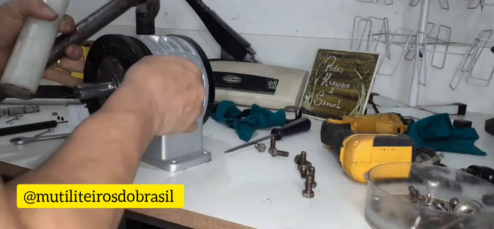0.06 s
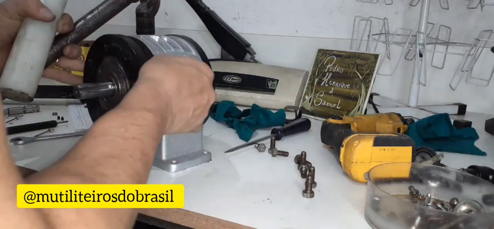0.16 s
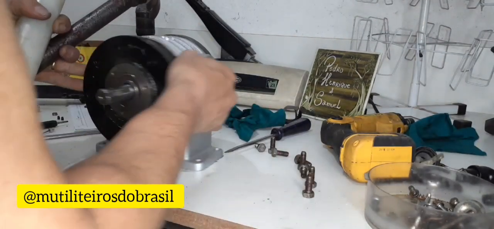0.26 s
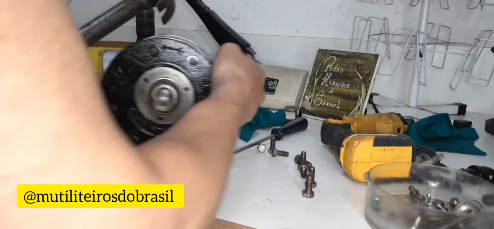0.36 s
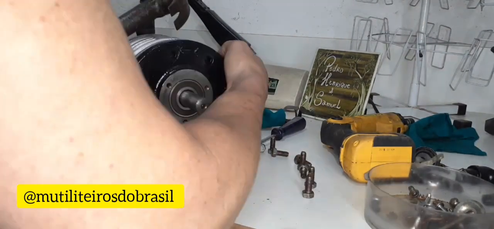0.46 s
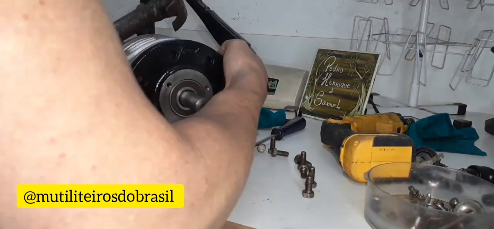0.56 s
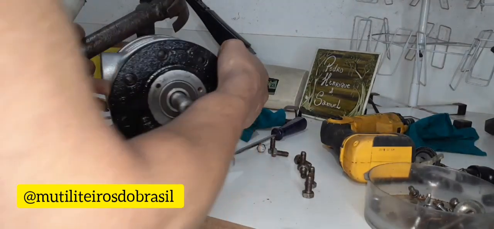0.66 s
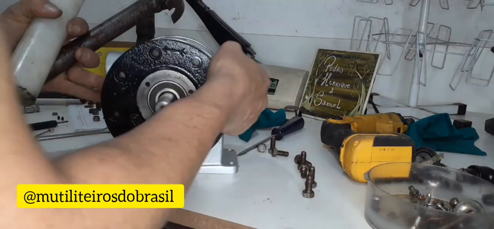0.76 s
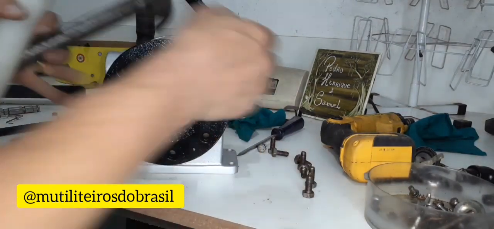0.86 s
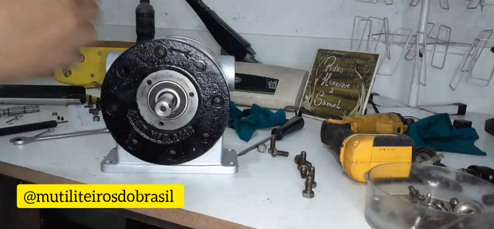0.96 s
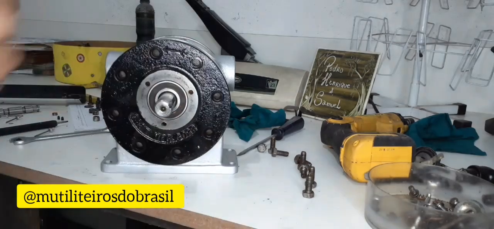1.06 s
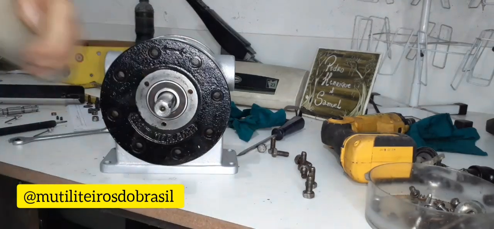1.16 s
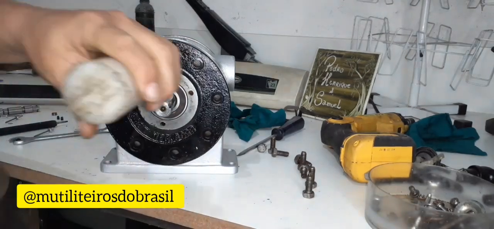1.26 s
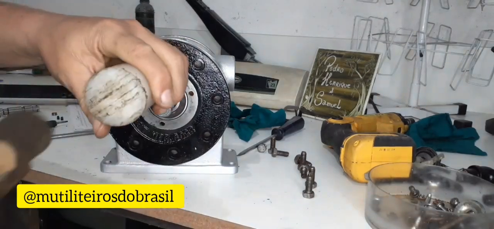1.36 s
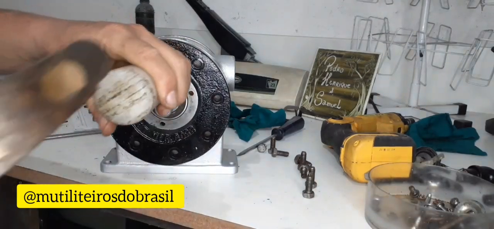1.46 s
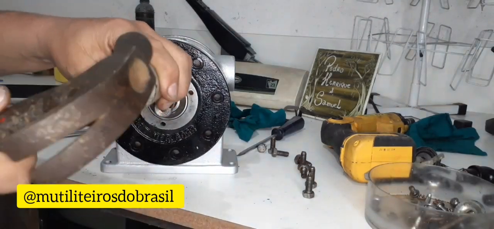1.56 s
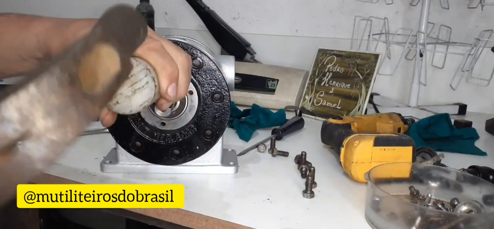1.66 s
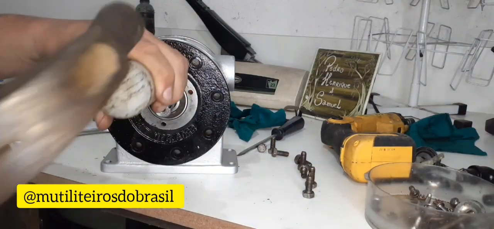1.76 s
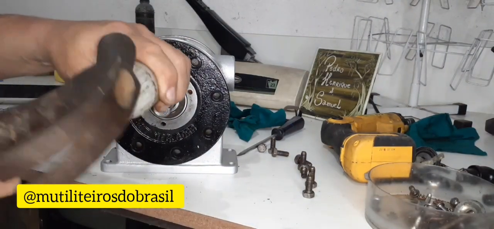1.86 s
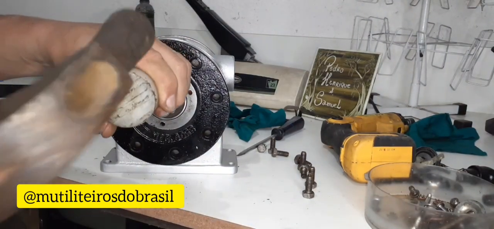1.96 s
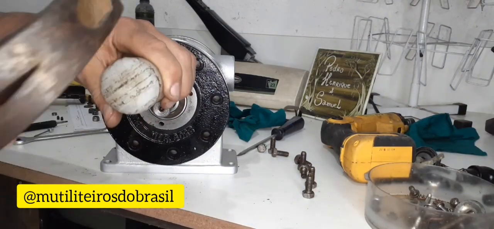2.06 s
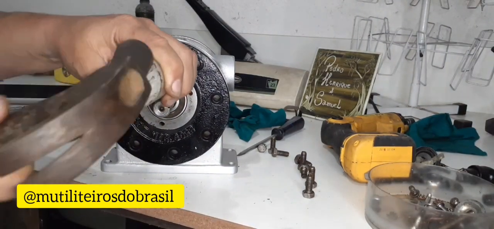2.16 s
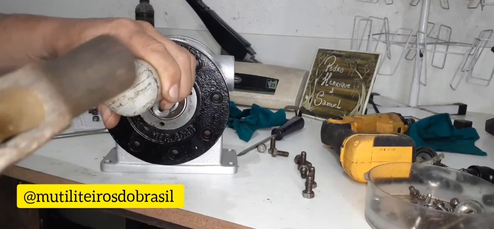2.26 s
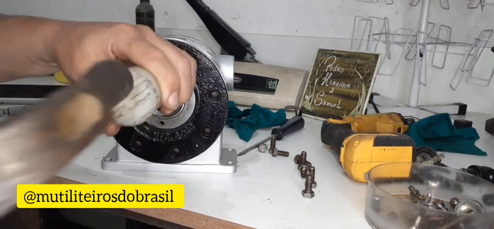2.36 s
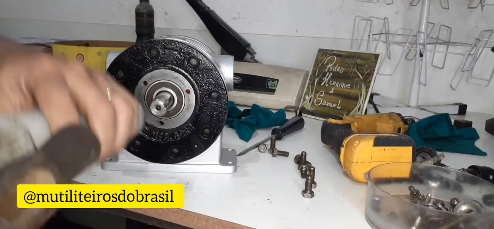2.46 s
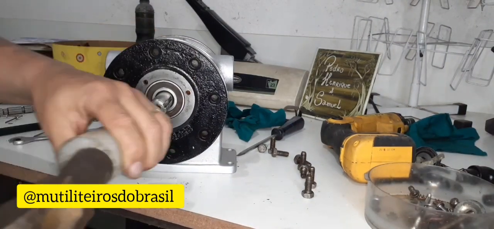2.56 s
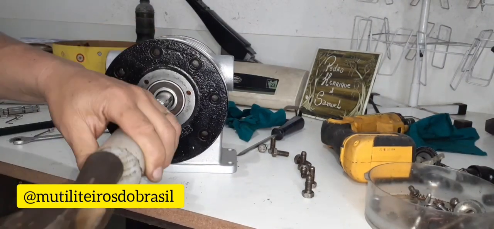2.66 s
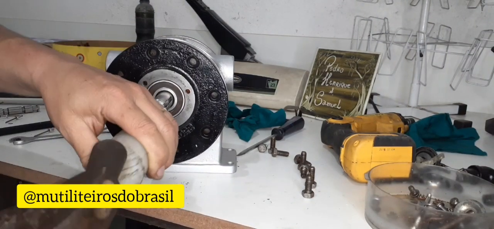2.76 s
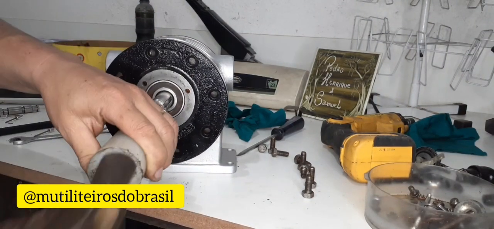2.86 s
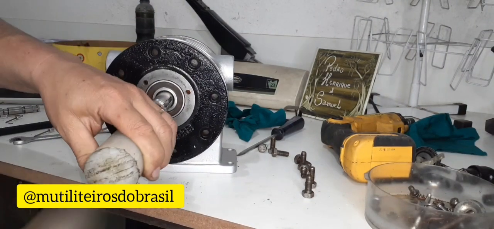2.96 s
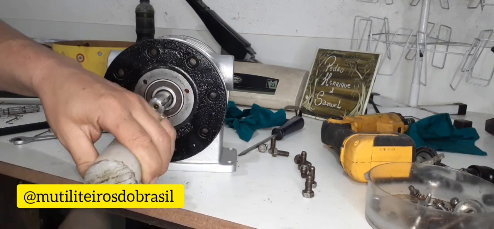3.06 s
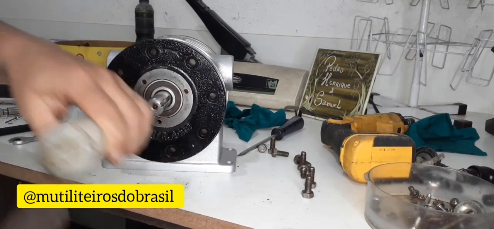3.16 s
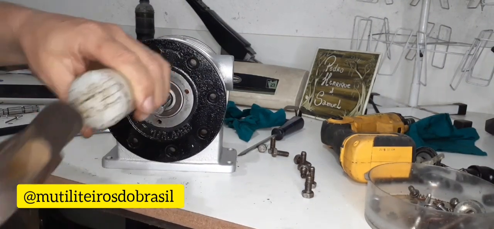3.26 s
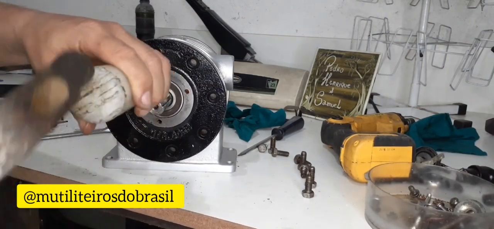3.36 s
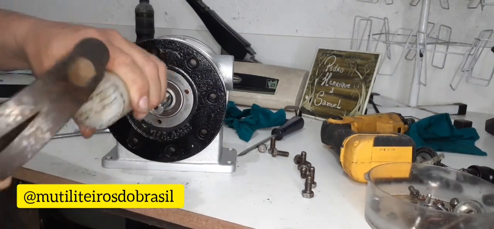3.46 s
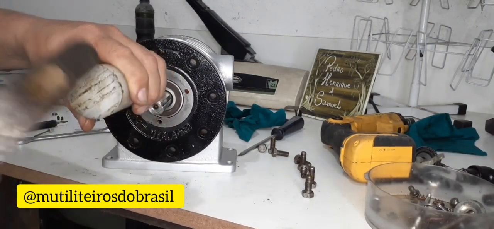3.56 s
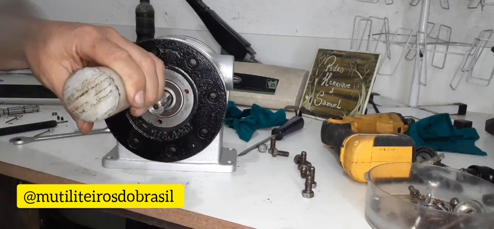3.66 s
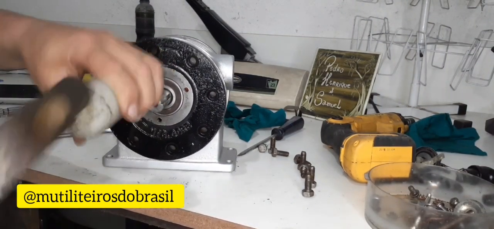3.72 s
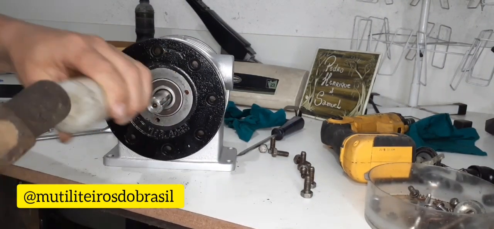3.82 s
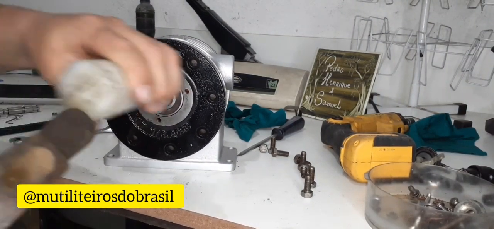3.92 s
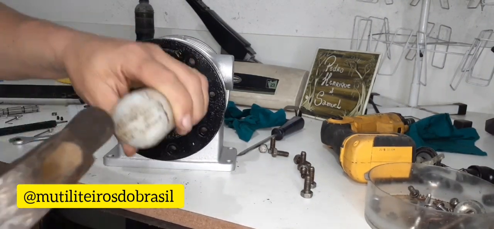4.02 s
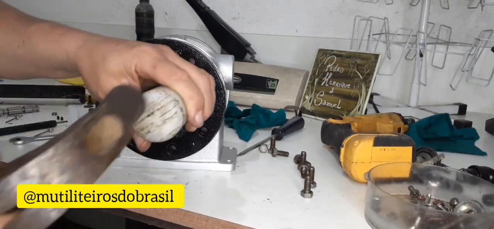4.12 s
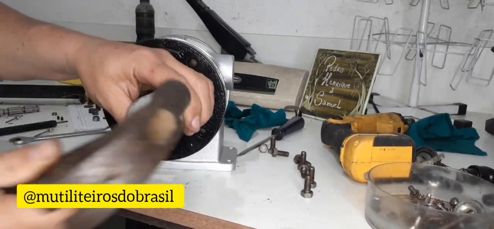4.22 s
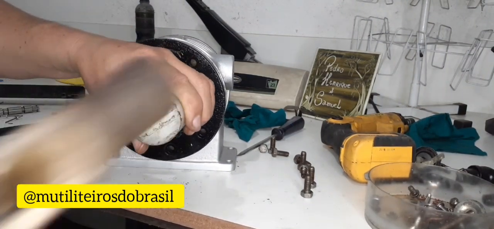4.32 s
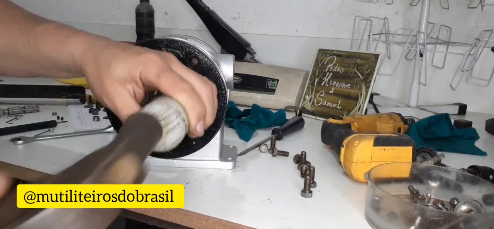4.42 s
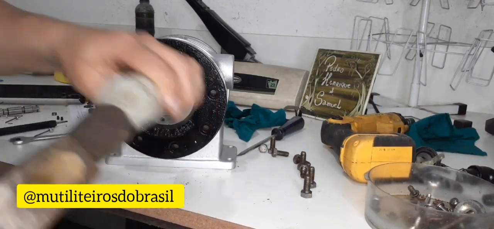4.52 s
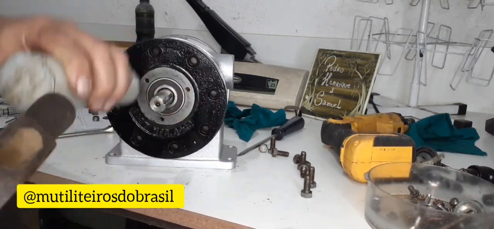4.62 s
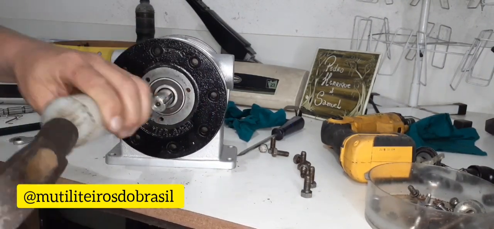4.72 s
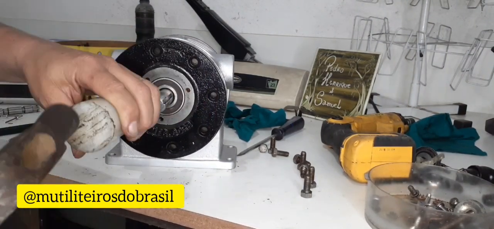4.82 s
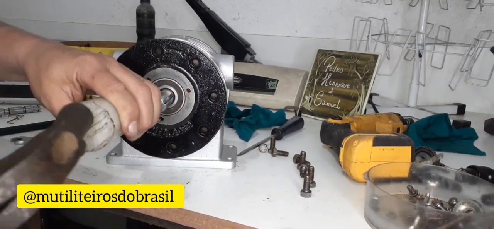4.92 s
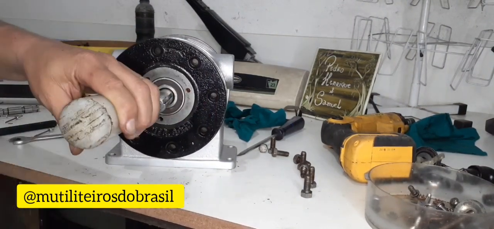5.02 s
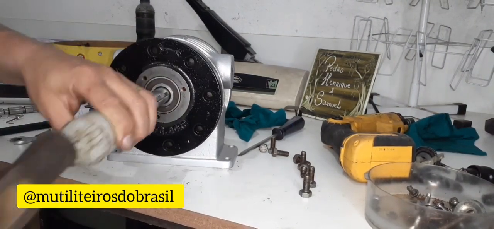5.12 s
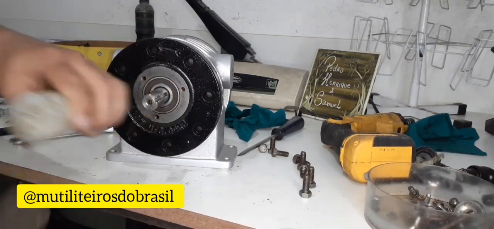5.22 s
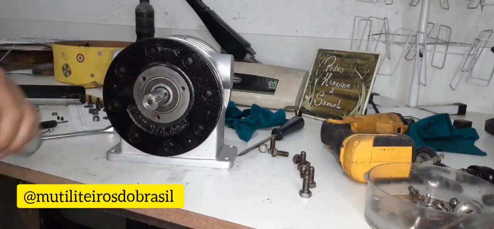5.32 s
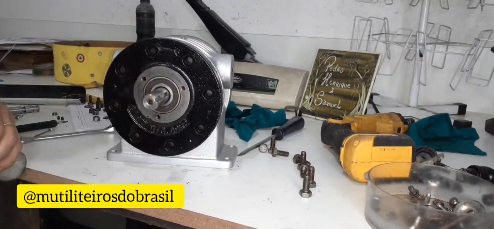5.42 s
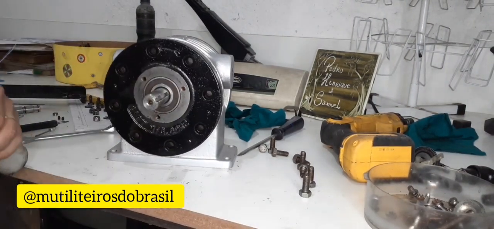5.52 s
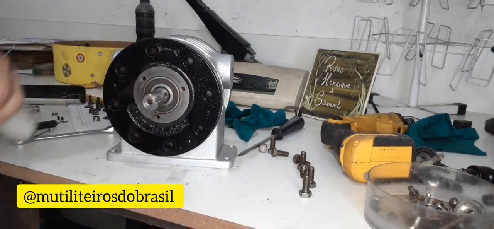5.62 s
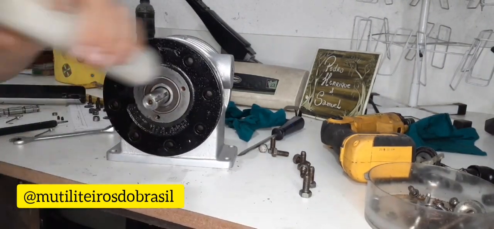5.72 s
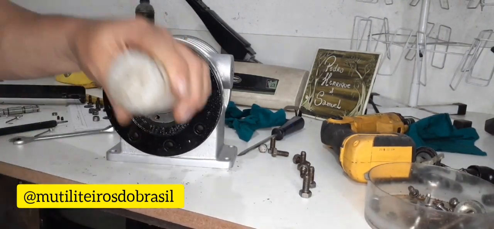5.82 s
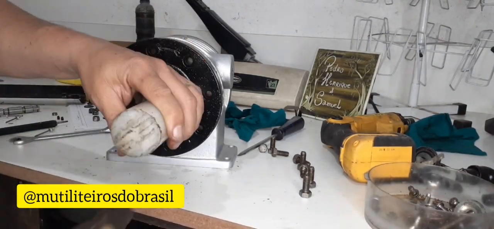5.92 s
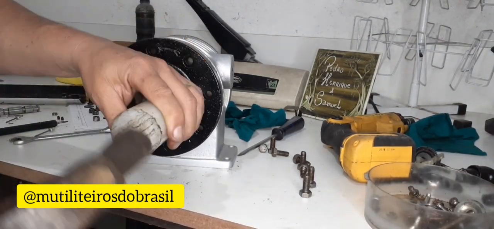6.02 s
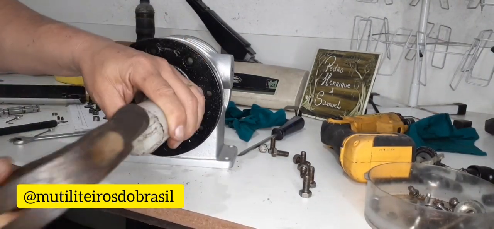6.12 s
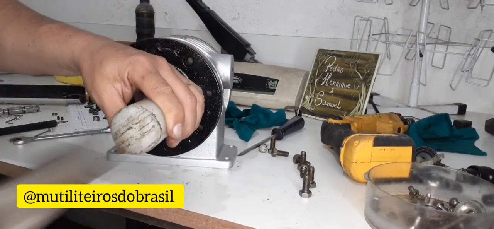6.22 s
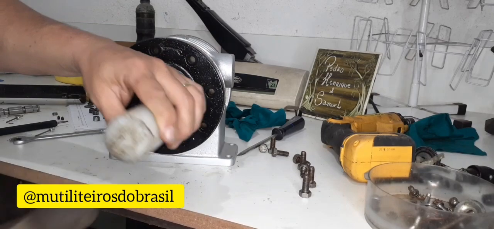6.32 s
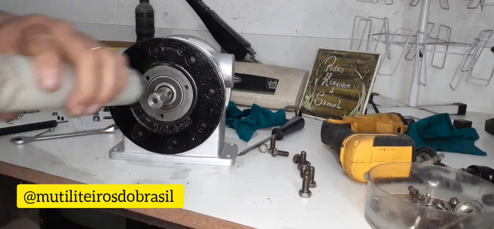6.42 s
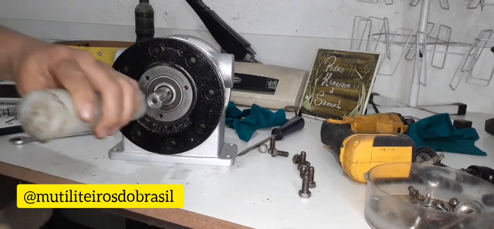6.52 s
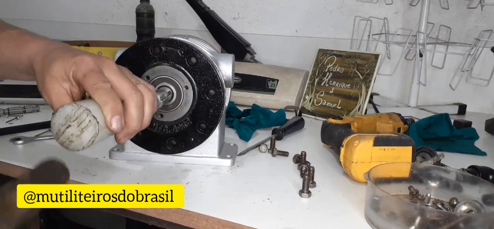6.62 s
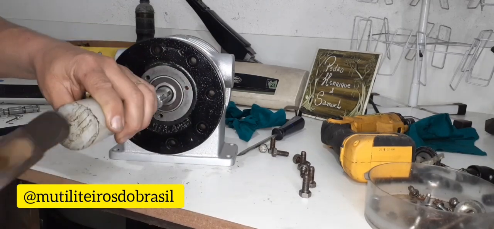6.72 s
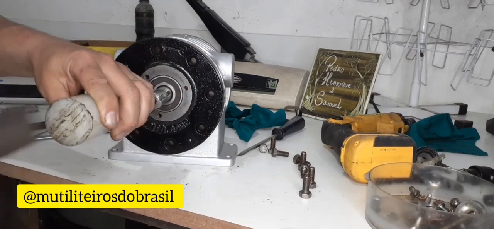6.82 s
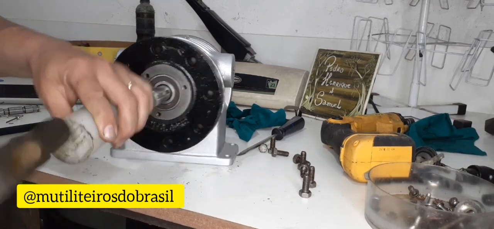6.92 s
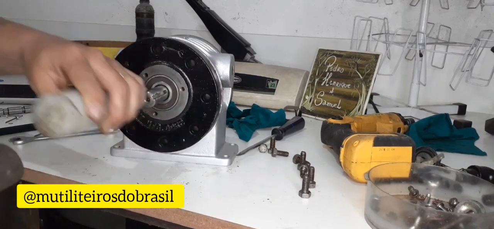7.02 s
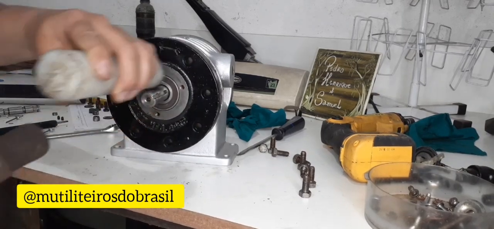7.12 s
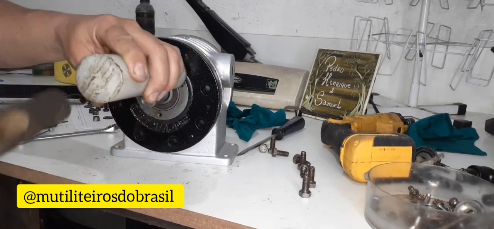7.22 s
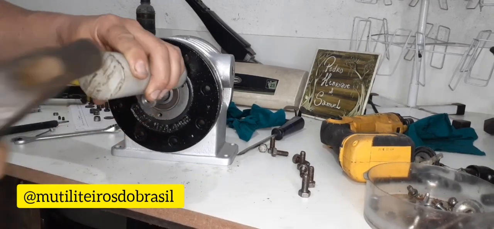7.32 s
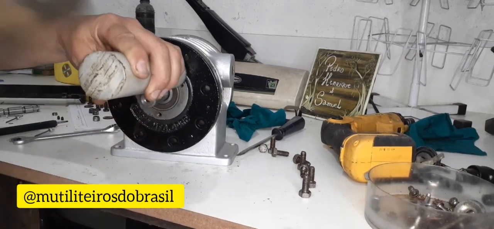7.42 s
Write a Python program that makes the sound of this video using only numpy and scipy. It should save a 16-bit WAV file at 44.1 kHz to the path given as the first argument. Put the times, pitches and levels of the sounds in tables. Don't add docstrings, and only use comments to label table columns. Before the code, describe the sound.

Close workshop hammering: brief metal-foot scrapes, small handling rustles, then irregular hard knocks with short metallic ring, gritty skids and bench thuds.

```python
import sys
import numpy as np
from scipy import signal
from scipy.fft import rfft, irfft
from scipy.io import wavfile
from scipy.ndimage import uniform_filter1d

SR = 44100
rng = np.random.default_rng(int(sys.argv[2]) if len(sys.argv) > 2 else 0)


def voltage_ratio(decibels):
    exponent = np.asarray(decibels, float) / 20
    return 10 ** exponent


def generate_wav(sig):
    pcm = np.round(np.clip(np.atleast_2d(sig).T, -1, 1) * 32767).astype(np.int16)
    wavfile.write(sys.argv[1], SR, pcm)


N = 329868
LEAD_S = 0.00015

# pitch in Hz, level in dB, t60 in s.
BENCH_MODES = [(76, -21, 0.27), (113.6, -4, 0.14), (139.5, -6, 0.06), (186.9, -2.5, 0.14),
               (191.6, -27, 0.86), (235, 5, 0.077), (287, -4.5, 0.03), (318, 1, 0.083), (445, -5.5, 0.15)]
# frequency in Hz, level in dB per Hz.
FOOT_GRIT = [(35, -39), (60, -14), (287, -4.5), (448, -11), (822, -7.5), (1200, -3.5), (2190, -4),
             (4120, -16), (5720, -19.5), (7230, -30.5), (9790, -22), (11300, -34.5), (16000, -41)]
# frequency in Hz, level in dB per Hz.
HISS_COLOUR = [(1000, -8.5), (3000, -3), (7000, -11), (8500, -4), (10000, -4.5), (15000, -12)]


def evened(x):
    return x / np.sqrt(np.mean(x ** 2) + 1e-30)


def read(points, hz):
    f, value = np.transpose(points)
    return np.interp(np.log(hz + 1), np.log(f + 1), value)


def slope(hz, corner_hz):
    return -10 * np.log10(1 + (hz / corner_hz) ** 4)


def add(mix, s, sound):
    part = mix[..., round(s * SR):][..., :sound.shape[-1]]
    part += sound[..., :part.shape[-1]]


def shaped(x, db_of):
    hz = np.fft.rfftfreq(x.shape[-1], 1 / SR)
    return irfft(rfft(x) * voltage_ratio(db_of(hz)), x.shape[-1])


def paired(a, b):
    # frequency in Hz, left-right likeness from 0 to 1.
    likeness = [(100, 0.99), (300, .85), (600, 0.91), (1200, 0), (4000, 0.48), (12000, 0)]
    same = np.clip(read(likeness, np.fft.rfftfreq(len(a), 1 / SR)), -1, 1)
    right = irfft(same * rfft(a) + np.sqrt(1 - same ** 2) * rfft(b), len(a))
    return np.array([a, right])


def grains(size, per_s, spread_db):
    hit = rng.random(size) < per_s / SR
    sign = rng.choice([-1., 1.], size)
    force = voltage_ratio(spread_db * np.minimum(rng.exponential(1, size), 4))
    return evened(hit * sign * force)


def strokes(rows, rise_db_per_s, fall_db_per_s):
    start, stop, start_db, stop_db = np.transpose(rows)[:, :, None]
    t = np.arange(0, N / SR, .001)
    progress = np.clip((t - start) / (abs(stop - start) + 0.00086), 0, 1)
    level_db = start_db + (stop_db - start_db) * progress
    level_db -= rise_db_per_s * np.maximum(start - t, 0)
    level_db -= fall_db_per_s * np.maximum(t - stop, 0)
    return np.interp(np.arange(N) / SR, t, voltage_ratio(level_db.max(0)))


def ring(modes, scatter_db, rise_s, grip_t60=np.inf, size=22050):
    hz, db, t60 = np.transpose(modes)[:, :, None]
    share, tune = rng.standard_normal((2, len(modes), 1))
    t = np.arange(size) / SR
    fall_db = 60 * t * (1 / t60 + 1 / grip_t60)
    wave = np.sin(2 * np.pi * hz * (1 + 0.014 * tune) * t)
    x = (voltage_ratio(db + scatter_db * share - fall_db) * wave).sum(0)
    x = x * (1 - np.exp(-t / rise_s))
    return x / abs(x).max()


def skid(length_s, colour, swell=1, size=6000):
    u = np.arange(size) / SR / length_s
    slide = np.sqrt(u ** swell * np.exp(swell * (1 - u ** 0.86)))
    slips = grains(size, 2500, 4.1) * slide
    grit = shaped(slips, colour)
    grit_rms = np.sqrt(np.mean(grit[:round(3 * length_s * SR)] ** 2))
    return slips * slide, grit / grit_rms * slide


def drag():
    # start in s, stop in s, start in dB, stop in dB, relative treble in dB.
    pushes = [
        (-.01, 0.001, -67, -60, -22),
        (0.217, 0.41, -47.5, -39.5, -2.5),
        (0.416, 0.471, -39, -39.5, -13.5),
        (0.621, 0.751, -56, -42.5, -7),
    ]
    # frequency in Hz, level in dB per Hz.
    drag_colour = [(29, -39), (50, -11), (87, -6.5), (189, -8.5), (258, 0.5), (439, -5), (1020, -14),
                   (1180, -8.5), (1430, -11.5), (2210, -8.5), (3670, -19.5), (7390, -45), (9180, -29),
                   (14900, -57.5), (16000, -40.5)]
    rise_db_per_s, fall_db_per_s = 593, 900
    slips = shaped(grains(N, 5000, 3.0), lambda hz: read(drag_colour, hz))
    low = shaped(slips, lambda hz: slope(hz, 2400))
    lumps = voltage_ratio(1.7 * evened(uniform_filter1d(rng.standard_normal(N), 500)))
    rumble = strokes([row[:-1] for row in pushes], rise_db_per_s, fall_db_per_s)
    treble_rows = [(a, b, c + db, d + db) for a, b, c, d, db in pushes]
    hiss = strokes(treble_rows, rise_db_per_s, fall_db_per_s)
    return lumps * (rumble * evened(low) + hiss * evened(slips - low))


def sleeve():
    # start in s, level in dB.
    swings = [(1.56, -62.5), (1.7, -54), (1.85, -54), (2.0, -63.5), (2.19, -57.5), (2.77, -67.5),
              (2.91, -64), (3.47, -68), (3.6, -60), (4.255, -58), (4.93, -66), (5.23, -72), (6.12, -62.5),
              (6.79, -61), (7.375, -55.5)]
    # start in s, stop in s, start in dB, stop in dB.
    shifting = (0.0, 1.5, -85, -79)
    swing_s, fade_db, edge_db_per_s = 0.074, -5.5, 500
    rows = [(s, s + swing_s, db, db + fade_db) for s, db in swings] + [shifting]

    def cloth_colour(hz):
        band = slope(hz, 14000) + slope(3000 / (hz + 1), 0.99)
        return read(HISS_COLOUR, hz) - 3.0 * (hz < 7900) + band

    rubbing = np.array([grains(N, 9000, 2.5), grains(N, 9000, 2.5)])
    cloth = shaped(rubbing, cloth_colour)
    return strokes(rows, edge_db_per_s, edge_db_per_s) * evened(cloth)


def air():
    # time in s, level in dB.
    outside = [(0, -83.5), (2.1, -81.5), (3.3, -74.5), (4.05, -75), (5.0, -71.5), (5.55, -77.5),
               (5.85, -65), (6.15, -74.5), (7.48, -73)]
    # frequency in Hz, level in dB per Hz.
    air_colour = [(15, -55.5), (25, -28.5), (76, -14), (94, -8), (114, -9), (130, -15.5), (141, -29),
                  (195, -12.5), (384, -36.5), (2220, -59), (5570, -50), (6920, -60.5), (8590, -44.5),
                  (14000, -46.5), (16000, -47)]
    noise = shaped(paired(*rng.standard_normal((2, N))), lambda hz: read(air_colour, hz))
    low = shaped(noise, lambda hz: slope(hz, 240))
    murmur = shaped(noise - low, lambda hz: slope(hz, 2500))
    s, db = np.transpose(outside)
    rumble_db = np.interp(np.arange(N) / SR, s, db)
    murmur_db = -81.5 + 0.68 * (rumble_db - rumble_db.mean())
    return voltage_ratio(rumble_db) * evened(low) + voltage_ratio(murmur_db) * evened(murmur)


def rustle():
    # start in s, stop in s, start in dB, stop in dB.
    rubs = [
        (.99, 1.05, -63.5, -61),
        (1.09, 1.135, -62.5, -59.5),
        (1.2, 1.31, -69.5, -63),
        (1.362, 1.375, -72, -67),
    ]
    # pitch in Hz, level in dB, t60 in s.
    clink_modes = [(430, -3, .15), (1060, 0, .25), (1700, 1, .2), (2550, -3, .25)]
    clink_s, clink_db = 1.04, -52
    rub = grains(N, 6000, 2.8)
    hiss = shaped(rub, lambda hz: read(HISS_COLOUR, hz) - 7.9 * (hz < 7900))
    body = shaped(rub, lambda hz: slope(hz, 2100) + slope(300 / (hz + 1), 0.9))
    body_db = -6 - 110 * np.maximum(np.arange(N) / SR - clink_s, 0)
    out = strokes(rubs, rise_db_per_s=703, fall_db_per_s=504) * (evened(hiss) + voltage_ratio(body_db) * evened(body))
    add(out, clink_s, voltage_ratio(clink_db) * ring(clink_modes, 0, 0.0041))
    return out


def touch(db, hz, thud_db):
    sound = ring([(hz, 0, .04), (hz * 1.6, -4, .035), (hz * 2.1, -10, .03)], 2, .004)
    sound += voltage_ratio(thud_db) * ring(BENCH_MODES, 2.3, 0.008)
    scuff = skid(0.0097, lambda f: read(FOOT_GRIT, f) + 2.5 * slope(f, 1000))[1]
    add(sound, 0, voltage_ratio(-18) * scuff)
    return voltage_ratio(db) * sound


def tick(db, hz):
    modes = [(hz, 0, .04), (hz * 0.56, -6, .03), (hz * 1.2, -6, .03)]
    return voltage_ratio(db) * ring(modes, 2.7, 0.0017, size=3000)


def blow(s, knock_db, over_db, thud_db, fizz_db, skid_db, skid_s, swell):
    # time in s, pitch in Hz.
    tilted = [(2.0, 700), (4.9, 890), (6.1, 730), (6.3, 570), (7.4, 840)]
    # pitch in Hz, level in dB, t60 in s.
    drift_modes = [(1350, -9.5, 0.02), (1370, -12, 0.044), (1762, 9, .06), (2000, -9.5, 0.033),
                   (2180, -3.5, 0.066), (2600, -10.5, 0.057)]
    cover_modes = [(3280, -5, 0.01), (3625, 0, .04), (4050, 2, 0.09), (4310, -5, .03), (4710, 2.5, 0.023),
                   (5940, -17.5, 0.075), (6420, -4.5, 0.084), (9000, -8.5, 0.06), (9520, -10, 0.06),
                   (10063, -6, 0.11), (10880, -9.5, 0.017)]
    hammer_modes = [(2200, 0, .22), (4900, -14, .1), (6490, -18, .08)]
    grip_t60 = .035
    hammer_free_s = .16
    pitch_hz = dict(tilted).get(round(s, 1), 800)

    def colour(hz):
        middle = np.exp(-(np.log((hz + 1) / 1900) / 1.6) ** 2)
        overtones = (over_db + 5.5) * middle
        pitch_peak = 5.7 / (1 + ((hz - pitch_hz) / 110) ** 2)
        bass = 0.19 * np.clip(thud_db - skid_db + 9.5, -14, 8)
        bass = bass / (1 + (hz / 500) ** 3) / (1 + (170 / (hz + 1)) ** 3)
        treble = (fizz_db + 14) / (1 + (3000 / (hz + 1)) ** 3)
        return read(FOOT_GRIT, hz) + overtones + pitch_peak + bass + treble

    slips, grit = skid(skid_s, colour, swell)
    drive = voltage_ratio(skid_db - 44.5) * slips
    drive[0] += 1
    knock_modes = [(pitch_hz, 0, .1), (pitch_hz * .86, -12, .05),
                   (pitch_hz * 1.15, -11, .05), (pitch_hz * 1.33, -10, .05)]
    metal = ring(knock_modes, 1, .0005, 1.3 * grip_t60)
    metal += voltage_ratio(over_db + 6) * ring(drift_modes, 1, .0005, grip_t60 / 1.4)
    metal += voltage_ratio(fizz_db + 10.5) * ring(cover_modes, 2.2, 0.0012, grip_t60 / 2)
    sound = signal.fftconvolve(drive, metal)[:len(metal)]
    free = np.clip((hammer_free_s - np.arange(len(metal)) / SR) / .02, 0, 1)
    sound += voltage_ratio(-38 - skid_db) * ring(hammer_modes, 2, 0.0018) * free
    add(sound, .003, voltage_ratio(thud_db + 1.5) * ring(BENCH_MODES, scatter_db=2, rise_s=.008))
    add(sound, 0, voltage_ratio(skid_db - 7.5) * grit)
    crack = skid(.002, colour)[1]
    add(sound, 0, voltage_ratio(-5.0 + .5 * max(knock_db, -30)) * crack)
    return voltage_ratio(knock_db) * sound


def shove(s, db, thud_db, fizz_db, length_s):
    over_db = -4 + 0.26 * db
    return blow(s, db - 22, over_db, thud_db + 25.0, fizz_db, skid_db=23.0, skid_s=length_s, swell=2.1)


def clean_blow(s, db, over_db, fizz_db, skid_db):
    thud_db = -14.5 - 0.3 * skid_db ** 2
    return blow(s, db, over_db, thud_db, fizz_db, skid_db, skid_s=0.0096, swell=0.67)


def ported(x):
    lag, left, right = rng.random(3)
    out = np.zeros((2, len(x) + 400))
    add(out[0], 0, x)
    add(out[1], LEAD_S * 2 * lag, x)
    add(out[0], .0004 + .003 * left, voltage_ratio(-9) * x)
    add(out[1], .0004 + .003 * right, -voltage_ratio(-9) * x)
    return out


def room(x, count=3):
    # frequency in Hz, t60 in s.
    decay = [(100, 0.35), (260, 0.35), (700, 0.25), (1840, 0.28), (4850, 0.21), (12800, 0.13)]
    # frequency in Hz, level in dB.
    echo_colour = [(80, 2), (300, 1.5), (800, 2), (2000, -4), (5000, 2), (8000, -0.5), (14000, 4.5)]
    size = SR // 2
    out = np.zeros((2, N))
    turn = np.arange(N) / SR * 6.3
    build_up = 1 - np.exp(-np.arange(size) / (0.013 * SR))
    for k in range(count):
        taps = np.zeros((2, size))
        at = np.arange(300, size - 16, 16) + rng.integers(0, 16, (2, (size - 301) // 16))
        np.put_along_axis(taps, at, rng.choice([-1., 1.], at.shape), 1)
        hz, t, z = signal.stft(paired(*taps), SR, nperseg=512)
        fall_db = 60 * t / read(decay, hz)[:, None]
        z = z * voltage_ratio(read(echo_colour, hz)[:, None] - fall_db)
        tail = signal.istft(z, SR, nperseg=512)[1][:, :size] * build_up
        tail = tail / np.linalg.norm(tail[0])
        share = np.cos(np.pi * (turn + k / count)) * np.sqrt(2 / count)
        out += signal.oaconvolve((x * share)[None], tail, axes=1)[:, :N]
    return out


def scene():
    # start in s, level in dB, pitch in Hz, relative bench thud in dB.
    touches = [(1.397, -56, 487, 6), (1.446, -67.5, 487, 7), (1.487, -54, 514, 1.5), (2.023, -48.5, 560, 2),
               (3.299, -63.5, 518, -2), (3.45, -45.5, 684, -5.5), (4.118, -53, 840, -6),
               (4.778, -59.5, 529, 0), (5.889, -50.5, 632, -16.5), (5.934, -39, 482, -12),
               (6.016, -68, 552, -28), (6.627, -44, 567, -8.5), (7.249, -79, 581, 11.5)]
    # start in s, level in
    # dB, pitch in Hz.
    ticks = [(1.4794, -70.5, 9730), (1.9929, -33.5, 4130), (4.0986, -66, 4100), (5.2994, -66, 3900),
             (5.6394, -67, 9060), (5.7394, -77.5, 13950), (5.9094, -71, 4120), (6.6094, -70, 4020),
             (5.874, -69.5, 1770), (5.905, -63, 1740), (6.612, -67.5, 1770), (6.632, -64, 1780),
             (7.357, -37.5, 5040), (1.9955, -24.5, 783)]
    # peak in s, level in dB, relative bench thud in dB,
    # relative metal fizz in dB, skid length in s.
    shoves = [(1.54, -23.5, -15.5, -32.5, 0.012), (2.168, -20.5, -29.5, -20.5, 0.012),
              (2.304, -16, -9, -14.5, 0.02), (2.747, -38.5, -6.5, -34, 0.013),
              (2.881, -31, -12.5, -23, 0.018), (3.026, -14.5, -29, -2.5, 0.016),
              (3.448, -44, -4.5, -32.5, 0.015), (3.579, -29.5, -18.5, -25.5, 0.02),
              (4.229, -32, -11.5, -24, 0.022), (6.251, -12.5, -19.5, -9.5, 0.015),
              (6.761, -29.5, -25, -25, 0.02)]
    # start in s, knock in dB, then overtones, metal fizz and skid in relative dB.
    blows = [
        (1.679, -7.5, -6.5, -23.5, -13.5),
        (1.828, -6.5, -5.5, -21, -23),
        (1.985, -22, -14, -27, -13.5),
        (3.722, -13, -8.5, -15, 0.5),
        (4.385, -7.5, -3.5, -11.5, -5),
        (4.9096, -23, -13.5, -28.5, -9),
        (5.071, -10.5, -5.5, -13.5, -2),
        (6.102, -16, -12.5, -22.5, -12.5),
        (6.91, -7.5, -9, -12.5, -5),
        (7.3552, -17, -15, -25.5, -9.5),
    ]
    handling = drag() + rustle()
    near = np.array([handling, np.roll(handling, round(LEAD_S * SR))])
    for s, *row in touches:
        add(near, s, ported(touch(*row)))
    for s, *row in shoves:
        add(near, s - .007, ported(shove(s, *row)))
    for s, *row in blows:
        add(near, s, ported(clean_blow(s, *row)))
    echo = room(near[0] - 0.5 * handling)
    for s, *row in ticks:
        add(near, s, ported(tick(*row)))
    return voltage_ratio(0.5) * near + voltage_ratio(-4.5) * echo + air() + sleeve()


def low_pass(x):
    return signal.sosfilt(signal.butter(12, 16630, fs=SR, output="sos"), x)


def record(dry):
    def power_level(v):
        power = uniform_filter1d((v ** 2).mean(0), size=1300, origin=600)
        return 10 * np.log10(abs(power) + 1e-12)

    def band_edges(hz):
        return slope(50 / (hz + 1), 1.0) - .1 * np.maximum(hz - 15750, 0)

    bass = shaped(dry, lambda hz: slope(hz, 400))
    bright = dry - shaped(dry, lambda hz: slope(hz, 1200))
    shut_db = np.clip(1.1 * (power_level(bright) + 38), -27, 0)
    hiss = evened(shaped(rng.standard_normal((2, N)), lambda hz: read(HISS_COLOUR, hz)))
    tail_db = np.clip(0.18 * (power_level(dry) + 47), -8, 0)
    gated = bass + (dry - bass) * voltage_ratio(tail_db)
    mix = shaped(gated + voltage_ratio(-59.5 + shut_db) * hiss, band_edges)
    return low_pass(np.clip(mix, -.93, .93))


dry = scene()
out = record(dry)
generate_wav(out)
```